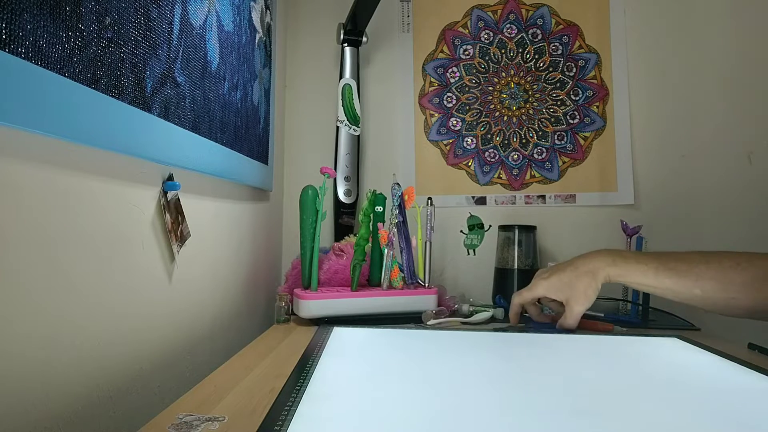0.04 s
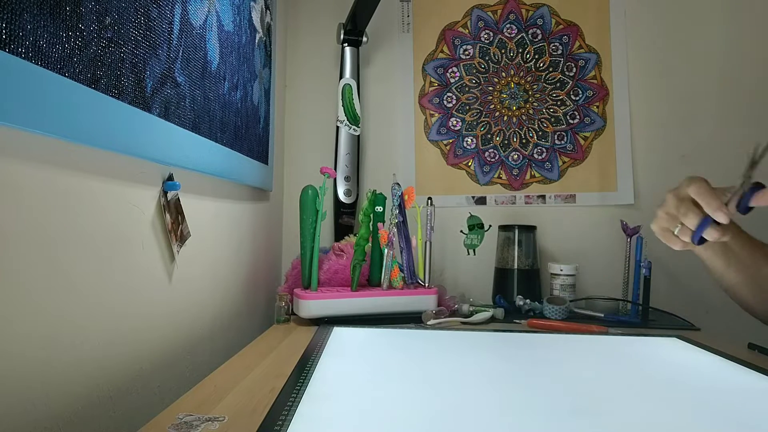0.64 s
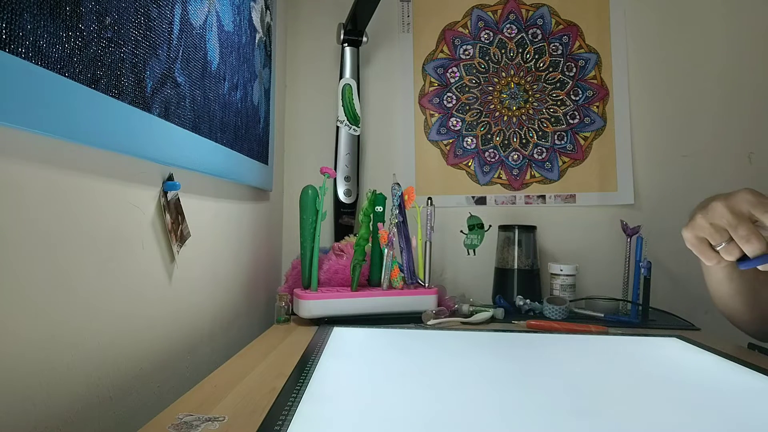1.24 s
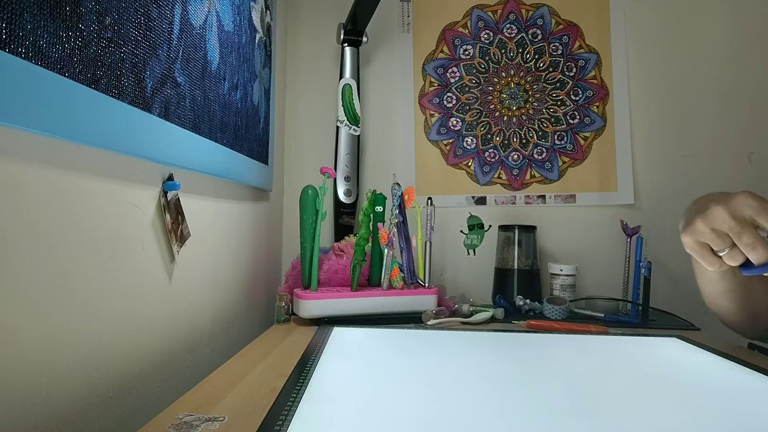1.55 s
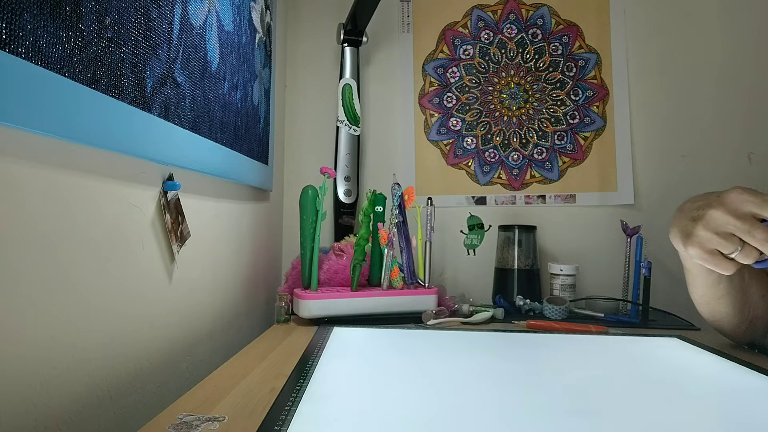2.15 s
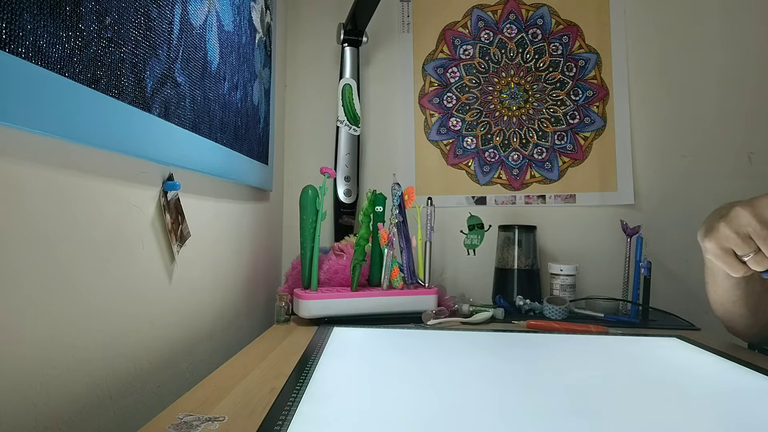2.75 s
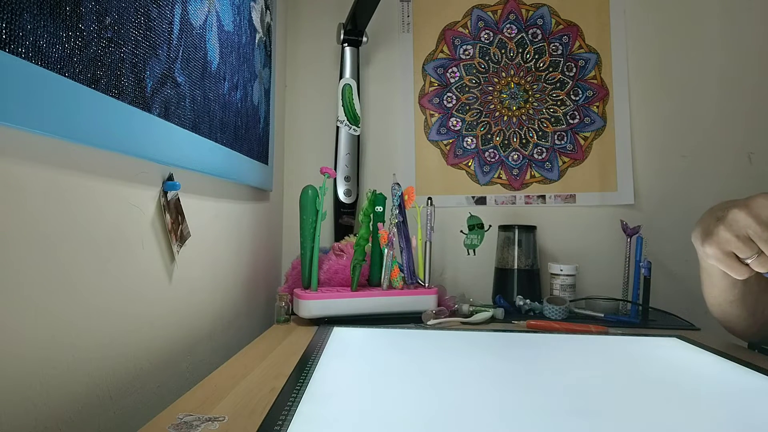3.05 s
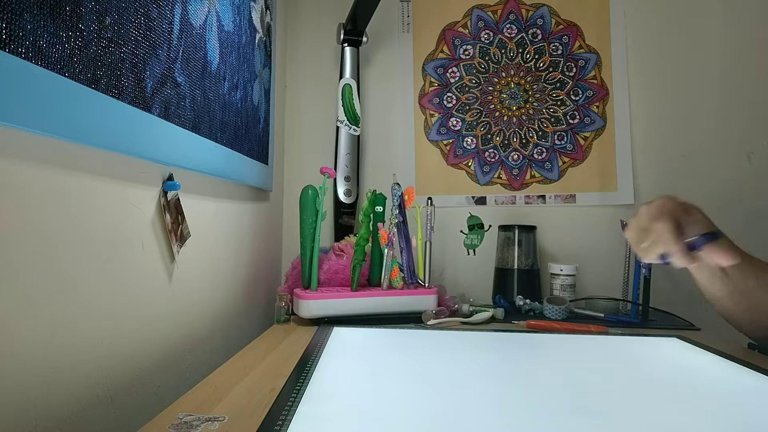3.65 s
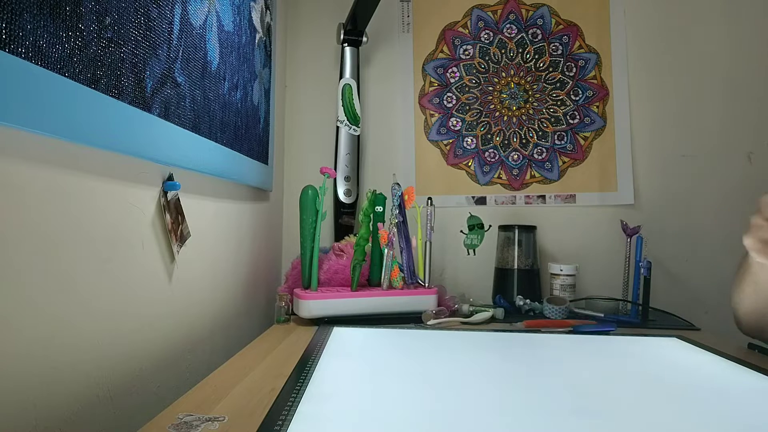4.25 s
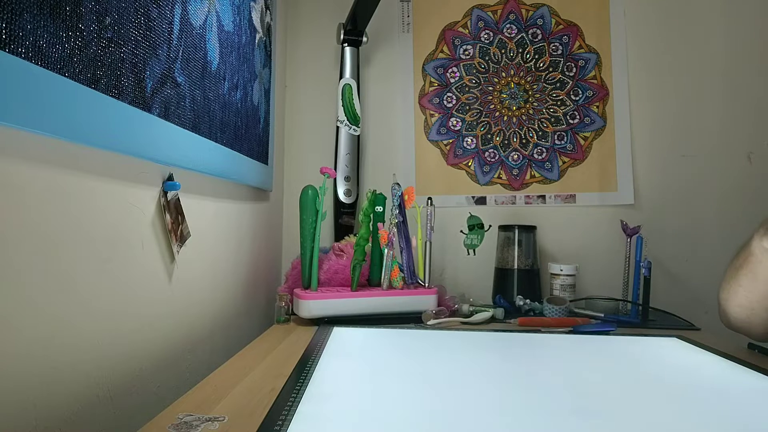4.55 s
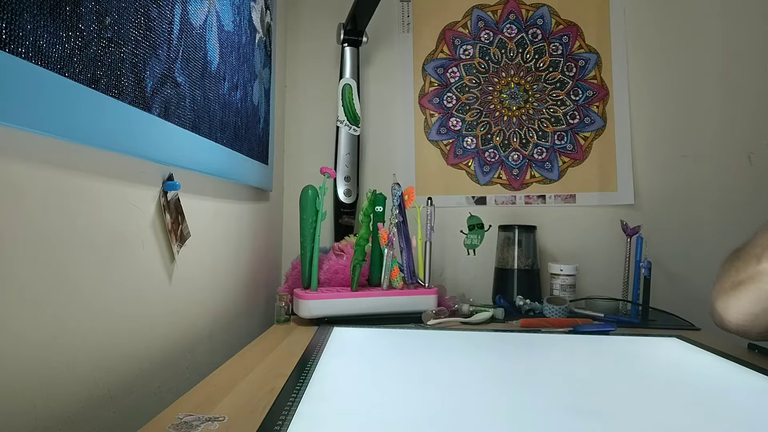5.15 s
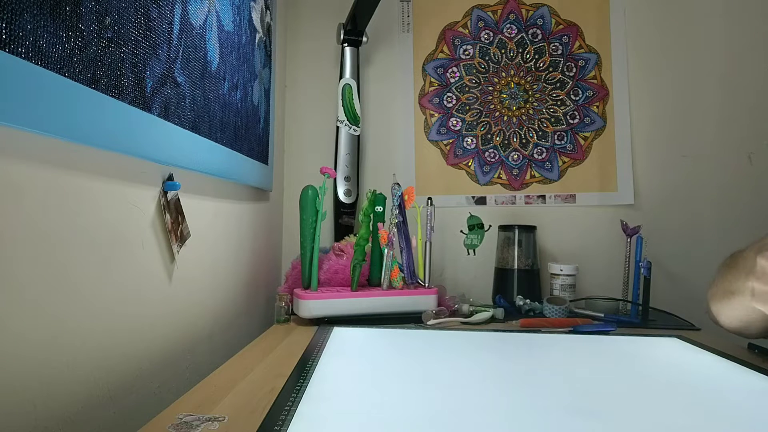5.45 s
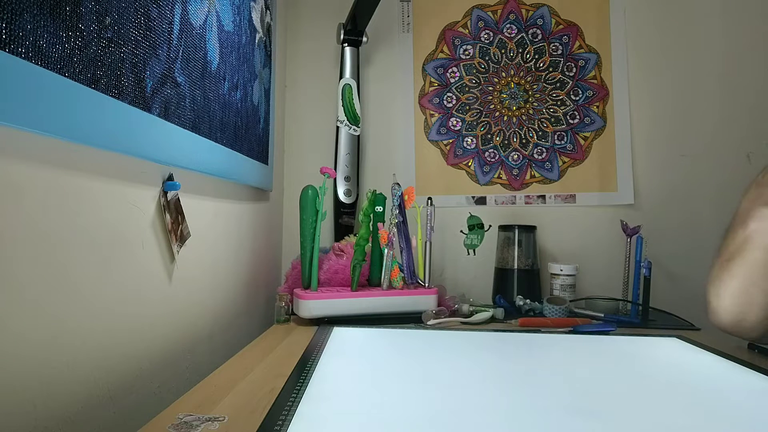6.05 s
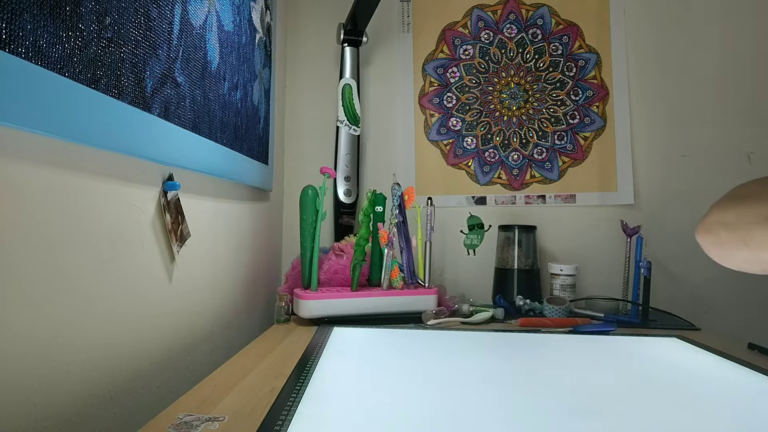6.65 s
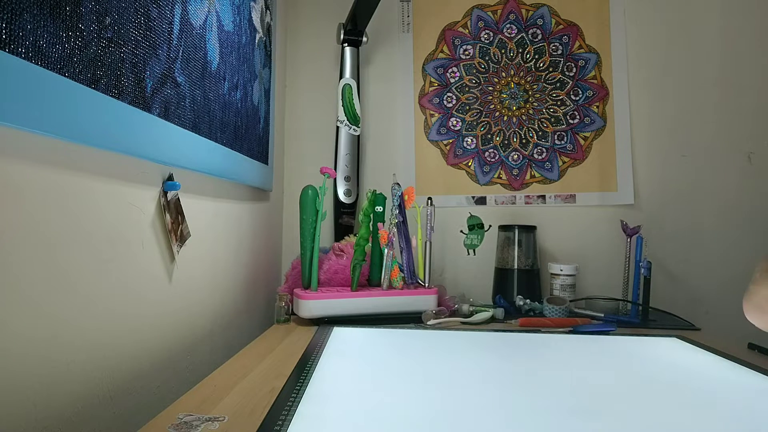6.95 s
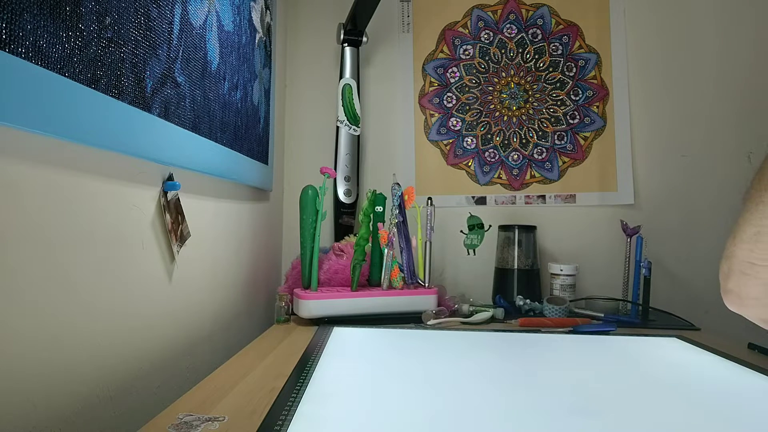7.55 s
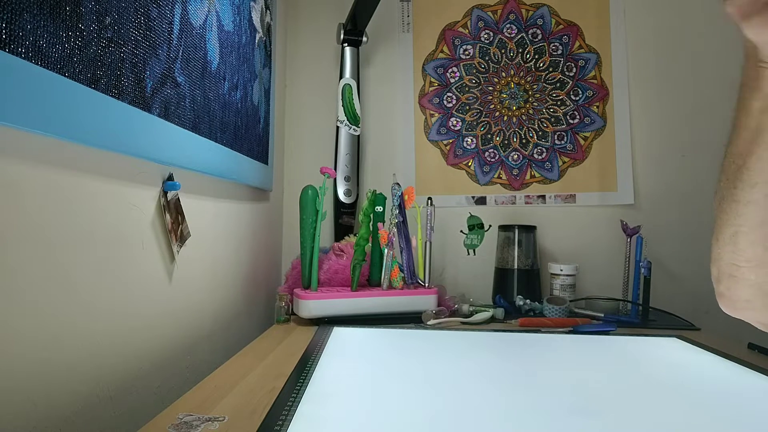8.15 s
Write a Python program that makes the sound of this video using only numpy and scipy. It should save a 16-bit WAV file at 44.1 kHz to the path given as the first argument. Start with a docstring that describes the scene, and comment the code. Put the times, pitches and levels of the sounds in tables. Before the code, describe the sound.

Scissors slide and clack lightly as they are picked up from a desk. They nip at the taut plastic wrap of a rolled canvas in a few bright, separate cracks, then are put down with a clatter and a thud. Hands pull at the wrap, which crinkles continuously with sharp snaps, small creaks and soft bumps. The sound is close, in a small, quiet room.

```python
"""At a desk in a small room, scissors slide and clack as they are picked up. They nip at the plastic wrap
of a rolled canvas, and the taut film parts with bright cracks. Put down with a clatter, they make the
desk thud and their blades ring. Then hands pull at the wrap: the film buckles in sharp snaps over a
dense crinkle, creaks under tension, and the roll bumps softly. A faint mains hum lies under it all."""
import sys
import numpy as np
from scipy import signal
from scipy.fft import rfft, irfft
from scipy.io import wavfile
from scipy.ndimage import uniform_filter1d

SR = 44100
rng = np.random.default_rng(int(sys.argv[2]) if len(sys.argv) > 2 else 0)


def persist_wave(psi):
    """Save psi, clipped to +-1, as 16-bit WAV."""
    counts = np.round(np.clip(psi, -1, 1) * 32767).astype(np.int16)
    wavfile.write(sys.argv[1], SR, np.atleast_2d(counts).T)


N = 365765

# Levels in the event tables are relative: each layer has its own gain in the mix.
# Cuts in the film. Each row: start in seconds, crack level in dB, body level in dB, body pitch in Hz.
FILM_CUTS = [(1.2193, -34, -50.5, 2210), (1.2998, -25.5, -51, 600), (1.302, -39, -52, 4300),
             (1.356, -39, -55.5, 1980), (1.4775, -52, -64, 1900), (1.8412, -37, -66, 2330),
             (1.8632, -37, -55, 3490), (1.8748, -15, -48.5, 3140), (1.8872, -12.5, -37.5, 2980),
             (1.937, -10.5, -37.5, 2360), (1.939, -30, -46, 600), (2.1142, -23, -56.5, 3340),
             (2.5316, -24, -51.5, 3300), (2.5518, -21, -55, 3300), (2.8364, -35, -67, 3120),
             (3.024, -32.5, -67, 3120), (3.252, -23, -56.5, 3500), (3.274, -11.5, -52, 4100),
             (3.3331, -1.5, -42, 1650)]
# Scissors on the desk. Each row: start in seconds, clack level in dB, thud level in dB, pitch in Hz.
DESK_KNOCKS = [(0.064, -24.5, -46, 1040), (0.105, -14.5, -57, 5330), (0.118, -19, -64, 5570),
               (0.175, -16, -61, 6370), (0.182, -10, -68, 2800), (0.193, -17.5, -49, 2600),
               (0.217, -17.5, -59, 3000), (0.23, -14, -45, 2110), (3.76, -23.5, -41, 964),
               (3.846, -26, -42.5, 1490), (3.864, -33, -40.5, 1510), (3.907, -13, -37, 1120),
               (3.92, -13, -27, 2210), (3.938, -20, -45, 1890), (3.956, -40, -35, 1200),
               (3.97, -23, -34.5, 1440), (3.984, -26, -37, 910), (4.044, -1, -34.5, 6730),
               (4.081, -10, -34.5, 1830), (4.1, -17, -40, 1900)]
# Spectrum of buckling film. Each row: frequency in Hz, relative density in dB.
FILM_SPECTRUM = [(1060, -41), (1800, -22.5), (4100, -15), (4790, -7), (7300, -3), (10200, 1), (14900, -2.5),
                 (15600, 2), (16000, -56)]


def snaps():
    """Snap-through buckling: folds flip with a pitched tick and shake the sheet; taut patches pop."""
    # Each row: start in seconds, crack level in dB, body level in dB.
    folds = [(0.3442, -18.5, -54), (0.405, -25.5, -51.5), (0.446, -32, -55.5), (0.594, -35.5, -64),
             (0.9126, -46, -61), (1.6064, -35.5, -57), (4.2472, -26, -51), (4.295, -25, -38),
             (4.567, -27.5, -48), (4.72, -45, -66), (4.758, -38, -49.5), (4.771, -30, -48),
             (4.8, -13.5, -46), (4.812, -24, -55), (4.856, -18.5, -45), (4.8894, -13, -48),
             (4.9323, -0.5, -34), (4.953, -9.5, -32.5), (4.981, -19, -47), (5.0703, -4.5, -28.5),
             (5.0862, -5, -29), (5.1131, -7, -28.5), (5.233, 0, -33), (5.269, -13, -35.5),
             (5.3197, 2, -36.5), (5.4004, -5, -38.5), (5.4122, -9.5, -39.5), (5.4332, -14, -38.5),
             (5.5619, -5, -33.5), (5.62, -12, -47), (5.679, -2, -31.5), (5.7039, 0, -32),
             (5.7188, -1.5, -31), (5.738, -9, -44), (5.8315, -12, -35), (5.8423, -10, -32),
             (5.9363, -9, -46), (5.9703, -5.5, -35), (6, -7, -39.5), (6.0932, -4.5, -38.5),
             (6.218, -11, -59), (6.233, -11.5, -58), (6.258, -8.5, -47), (6.306, -6, -36),
             (6.3218, -5, -39), (6.3298, -0.5, -33), (6.363, -4.5, -35), (6.4642, -3.5, -50.5),
             (6.494, -13, -56), (6.5383, 0.5, -40.5), (6.5474, -3, -37), (6.5772, -6.5, -50),
             (6.7175, -7, -48), (6.7304, -5, -40.5), (6.781, -4, -37.5), (6.8087, -11, -45),
             (6.8555, -5, -46), (6.9679, -8.5, -41), (7.0158, -11.5, -38), (7.11, -10.5, -60),
             (7.171, -15, -39), (7.196, -11, -38.5), (7.21, -8.5, -40), (7.383, -20.5, -42.5),
             (7.4406, -11, -38), (7.5711, -9, -40), (7.8444, -12, -61.5), (7.966, -8.5, -54),
             (8.0043, -10, -50), (8.0174, -6, -59), (8.0362, -10, -47.5), (8.0524, -4, -32),
             (8.0746, -7, -32.5), (8.0893, -1, -41), (8.121, -8, -51), (8.2287, -2.5, -43)]
    # Membranes, lower the wider they are. Each row: start in seconds, level in dB, pitch in Hz.
    patches = [(5.34, -36.5, 760), (5.68, -31, 670), (5.721, -30.5, 772), (5.938, -23, 4900),
               (5.94, -35.5, 383), (6.165, -23.5, 6250), (6.204, -18, 6400), (6.2279, -29, 6950),
               (6.301, -36, 660), (6.461, -14, 6900), (6.546, -34, 500), (7.57, -33.5, 2440),
               (7.789, -34, 2436), (7.966, -22, 3070), (8.035, -24, 3826)]
    # Each row: frequency in Hz, relative density in dB.
    sheet_spectrum = [(400, -19), (700, -1.5), (1300, -6), (2000, 0.5), (3500, 2.5), (7000, -2.5)]
    tick_ratio = .9  # amplitude of the tick against its burst
    crack = np.zeros(N)
    for s, crack_db, body_db in folds:
        # wide folds have more body and flutter longer
        flutter_s = np.clip(.01 * from_db(.5 * (body_db - crack_db + 35)), .005, .025)
        hz = rng.uniform(6500, 14500)
        gain = from_db(crack_db) / np.hypot(1, tick_ratio)
        add(crack, s, gain * burst(flutter_s, crack=.63))
        add(crack, s, gain * tick_ratio * tock(hz, cycles=30))
    for s, level_db, hz in patches:
        # the tighter the patch, the more of a crack goes with its pop
        add(crack, s, from_db(level_db + 5) * (hz / 6000) ** 2 * burst(.033, crack=.41))
    body = colour(strikes(folds, 2, t60=.052, crack=.51), sheet_spectrum)
    pops = tocks(patches, 1, 2, cycles=16)
    return from_db(7) * colour(crack, FILM_SPECTRUM) + from_db(25.5) * body + from_db(15.5) * pops


def crinkle():
    """Crumpling: small creases buckle more often as the grip tightens; wide folds rustle lower down."""
    # Each row: start in seconds, hold in seconds, crease level in dB, fold level in dB.
    squeezes = [(0, 0.11, -48, -49.5), (.176, 0.06, -35.5, -67), (.37, 0.06, -49.5, -55.5),
                (4.28, 0.018, -49, -57), (4.435, 0.01, -71, -56), (4.665, 0.022, -58, -68),
                (4.83, 0.1, -42.5, -81), (4.94, 0.023, -30.5, -76), (5.092, 0.0094, -23.5, -50),
                (5.25, 0.21, -33.5, -56), (5.46, 0.16, -32.5, -50), (5.70, 0.016, -24, -47),
                (5.84, 0.02, -28, -49.5), (5.94, 0.073, -34.5, -45), (6.10, 0.01, -27.5, -47.5),
                (6.25, 0.026, -37, -46), (6.325, 0.041, -23.5, -42), (6.48, 0.052, -29.5, -48.5),
                (6.535, 0.027, -23.5, -49), (6.64, 0.1, -31.5, -53), (6.76, 0.12, -27.5, -54.5),
                (7.02, 0.027, -30, -59.5), (7.13, 0.044, -30.5, -60), (7.2, 0.02, -28.5, -49.5),
                (7.27, 0.025, -37, -55), (7.41, 0.042, -44, -55.5), (7.60, 0.2, -33, -52.5),
                (7.78, 0.1, -29.5, -63), (7.96, 0.094, -32.5, -66.5), (8.07, 0.046, -22, -46),
                (8.27, 0.025, -24.5, -54.5)]
    # Each row: frequency in Hz, relative density in dB.
    fold_spectrum = [(100, -11.5), (420, -7), (620, -4.5), (1100, -8), (5000, -8)]
    moves = squeezes + [(4.85, N / SR, -48, -65)]  # once lifted, the roll never quite rests
    grip, sway = handling_gain(moves, 2), handling_gain(moves, 3)
    creases_per_s = np.minimum(270 * (grip / from_db(-33)) ** .6, 2000)
    fine = crackles(creases_per_s, spread_db=4.5, clump_db=4.5, low_hz=4290, high_hz=14960,
                    pitched=.46, cycles=88, even_s=.044)
    wide = crackles(per_s=200, spread_db=4, clump_db=3, low_hz=348, high_hz=1140,
                    pitched=.22, cycles=18, even_s=.028)
    creases = grip * colour(fine, FILM_SPECTRUM)
    rustle = sway * colour(wide, fold_spectrum)
    return from_db(-1.5) * creases + from_db(2.5) * rustle


def nips():
    """Fracture: taut film parts between the blades with a bright crack and a duller, pitched body."""
    # Each row of both: frequency in Hz, relative density in dB.
    crack_spectrum = [(1180, -60.5), (2200, -20), (4200, -6), (7300, 3), (9700, 9), (12700, 1.5),
                      (14900, 3.5), (16000, -23)]
    body_spectrum = [(150, -17), (500, -4), (1000, 0), (1800, 4), (3300, 8), (7000, 1)]
    crack = colour(strikes(FILM_CUTS, 1, t60=.021, crack=.065), crack_spectrum)
    body = colour(strikes(FILM_CUTS, 2, t60=.042, crack=.14), body_spectrum)
    tone = tocks(FILM_CUTS, 2, 3, cycles=9)
    return from_db(7.5) * crack + from_db(27.5) * body + from_db(26) * tone


def scissors():
    """Friction and impact: steel slides, clacks and clinks on the desk, whose top answers with a thud."""
    # Each row: start in seconds, hold in seconds, level in dB.
    slides = [(0, 0.26, -46)]
    # Each row of both: frequency in Hz, relative density in dB.
    steel_spectrum = [(530, -27.5), (900, -8), (1190, -4.5), (4200, -2.5), (9500, 5), (15500, -12)]
    desk_spectrum = [(50, -23.5), (105, 1), (210, -1.5), (1050, 2), (1700, -6.5), (3500, -13)]
    slide = handling_gain(slides, 2) * colour(rng.standard_normal(N), steel_spectrum)
    crack = colour(strikes(DESK_KNOCKS, 1, t60=.031, crack=.23), steel_spectrum)
    clink = blades(DESK_KNOCKS, lambda knock, hz, mode_db: knock[1] + mode_db, t60=.018)
    clack = tocks(DESK_KNOCKS, 1, 3, cycles=26)
    thud = colour(strikes(DESK_KNOCKS, 2, t60=.22, crack=.38), desk_spectrum)
    return slide + from_db(5) * crack + from_db(4.5) * clack + from_db(-20.5) * clink + from_db(23) * thud


def blade_ring():
    """Free vibration: the blades ring on after a nip or a knock, longest when no fingers damp them."""
    def knock_drive_db(knock, hz, mode_db):
        return .65 * knock[1] + mode_db  # even a soft knock sets the free blades ringing

    def nip_drive_db(cut, hz, mode_db):
        body_db, body_hz = cut[2:]
        return body_db - 22 * abs(np.log2(hz / body_hz))  # a nip wakes the modes near its own pitch

    let_go_s = 3.8
    knocked = blades([knock for knock in DESK_KNOCKS if knock[0] > let_go_s], knock_drive_db, t60=.24)
    nipped = blades(FILM_CUTS, nip_drive_db, t60=.17)
    return from_db(-42) * knocked + from_db(-10.5) * nipped


def blades(rows, drive_db, t60):
    """Modal superposition: each blow lands elsewhere, so it drives each mode with its own sign and size."""
    # Each row: frequency in Hz, relative level in dB.
    modes = [(1450, -7), (1845, -4), (2026, -5), (3310, -5), (3420, -8), (3817, -6), (4105, -3), (5080, -7),
             (5590, -1), (6590, 0), (8355, -5), (8833, -1), (10330, -3), (10790, -7), (13510, -1),
             (14980, -7)]
    ringing = np.zeros(N)
    for hz, mode_db in modes:
        blows = np.zeros(N)
        for row in rows:
            sign = rng.choice([-1, 1])
            add(blows, row[0], sign * from_db(drive_db(row, hz, mode_db) + rng.normal(0, 3, 1)))
        ringing += ring(blows, hz, t60)
    return ringing


def creak():
    """Stick-slip: film under tension rasps in small, quick, pitched slips."""
    # Each row: start in seconds, hold in seconds, level in dB.
    pulls = [(2.65, 0.096, -72.5), (4.84, 0.15, -50.5), (5.095, 0.053, -43.5), (5.25, 0.41, -56.5),
             (7.02, 0.32, -51), (7.6, 0.45, -47), (7.7, 0.14, -45)]
    slips = crackles(per_s=480, spread_db=3.5, clump_db=3.5, low_hz=2050, high_hz=4900,
                     pitched=2, cycles=13, even_s=.06)
    return handling_gain(pulls, 2) * slips


def roll():
    """Soft impact: hands and canvas roll bump, and the softer the contact, the duller the thump."""
    # Each row: start in seconds, level in dB, upper band edge in Hz.
    bumps = [(0.065, -26, 400), (5.433, -21, 650), (5.444, -22, 600), (5.702, -25, 400), (5.739, -16, 600),
             (6.1, -26, 190), (7.607, -27, 130), (7.615, -25, 120)]
    track = np.zeros(N)
    for s, level_db, top_hz in bumps:
        band = signal.butter(2, [50, top_hz], "band", fs=SR, output="sos")
        thump = signal.sosfilt(band, burst(.04, crack=2))
        add(track, s, from_db(level_db) * thump / np.linalg.norm(thump))
    return track


def settling():
    """Relaxation: the held wrap settles in faint dry ticks that fade."""
    # Each row: time in seconds, level in dB.
    fade = [(.5, -66), (.95, -69.5), (2.001, -76.5), (3.501, -82)]
    ticks = crackles(per_s=75, spread_db=3, clump_db=3, low_hz=3000, high_hz=12000,
                     pitched=.4, cycles=25, even_s=.25)
    level_db = np.interp(np.arange(N) / SR, *np.transpose(fade))
    high_pass = signal.butter(2, 1800, "high", fs=SR, output="sos")
    return from_db(level_db) * signal.sosfilt(high_pass, ticks)


def crackles(per_s, spread_db, clump_db, low_hz, high_hz, pitched, cycles, even_s, size=512):
    """Shot noise: creases give way in clumps, each with its own size, flutter and pitch; rms about 1."""
    born = rng.random(N) < per_s * from_db(clump_db * drift(25)) / SR
    clicks = born * from_db(spread_db * np.minimum(rng.exponential(1, N), 3.5))
    # a steady pull releases a steady flow of energy
    clicks /= np.sqrt(np.abs(uniform_filter1d(clicks ** 2, int(even_s * SR))) + 1e-4)
    starts, t = np.flatnonzero(born), np.arange(size) / SR
    pitch, length = rng.random((N, 2))[starts].T[:, :, None]
    hz = low_hz * (high_hz / low_hz) ** pitch
    ringing = np.diff(np.sin(2 * np.pi * hz * t) * from_db(-60 * t * hz / cycles), prepend=0)
    ringing /= np.linalg.norm(ringing, axis=1)[:, None]
    flutter_s = .002 + .013 * length ** 2
    flutter = rng.standard_normal((len(starts), size)) * from_db(-60 * t / flutter_s)
    flutter /= np.linalg.norm(flutter, axis=1)[:, None]
    grains = (pitched * ringing + flutter) * clicks[starts, None] / np.hypot(1, pitched)
    samples = starts[:, None] + np.arange(size)
    return np.bincount(samples.ravel(), grains.ravel(), N + size)[:N]


def handling_gain(rows, level_column):
    """Incoherent addition: each move tightens, holds and relaxes, and overlapping moves add in power."""
    tighten_db_per_s, relax_db_per_s = 448, 230.5
    t, power = np.arange(N) / SR, 0
    for row in rows:
        start_s, hold_s = row[:2]
        below_db = tighten_db_per_s * np.maximum(start_s - t, 0)
        below_db += relax_db_per_s * np.maximum(t - start_s - hold_s, 0)
        audible = below_db < 80
        gain = np.zeros(N)
        gain[audible] = from_db(row[level_column] - below_db[audible])
        power = power + gain ** 2
    return np.sqrt(power)


def burst(t60, crack, size=4096):
    """A broadband transient: an impulse, then exponentially decaying flutter; energy 1."""
    flutter = rng.standard_normal(size) * from_db(-60 * np.arange(size) / SR / t60)
    flutter /= np.linalg.norm(flutter)
    flutter[0] += crack * rng.choice([-1, 1])
    return flutter / np.linalg.norm(flutter)


def strikes(rows, level_column, t60, crack):
    """Impulsive excitation: one burst for each row."""
    track = np.zeros(N)
    for row in rows:
        add(track, row[0], from_db(row[level_column]) * burst(t60, crack))
    return track


def tock(hz, cycles, size=1024):
    """Damped oscillation: a small patch loses 60 dB in so many cycles; energy 1."""
    t = np.arange(size) / SR
    motion = np.sin(2 * np.pi * hz * t) * from_db(-60 * t * hz / cycles)
    wave = np.diff(motion)  # a small patch radiates little bass
    return wave / np.linalg.norm(wave)


def tocks(rows, level_column, pitch_column, cycles):
    """Constant-Q decay: one tock for each row, shorter the higher its pitch."""
    track = np.zeros(N)
    for row in rows:
        add(track, row[0], from_db(row[level_column]) * tock(row[pitch_column], cycles))
    return track


def ring(x, hz, t60):
    """Resonance: a unit click starts a decaying sine of height 1."""
    r, w = from_db(-60 / (t60 * SR)), 2 * np.pi * hz / SR
    return signal.lfilter([0, np.sin(w)], [1, -2 * r * np.cos(w), r * r], x + 1e-18)


def colour(x, spectrum, size=2048):
    """Minimum-phase filtering: a causal response with this spectrum; white noise keeps its power."""
    hz = np.arange(size // 2 + 1) * SR / size
    magnitude = rms_one(from_db(at_hz(spectrum, hz)))
    cepstrum = irfft(np.log(magnitude))
    cepstrum[1:size // 2] *= 2  # fold onto positive time
    cepstrum[size // 2 + 1:] = 0
    response = irfft(np.exp(rfft(cepstrum)))
    return signal.fftconvolve(x, response)[:len(x)]


def drift(rate_hz, step=100):
    """Low-passed noise: a slow wander of rms 1, drawn once every `step` samples."""
    r = np.exp(-2 * np.pi * rate_hz * step / SR)
    slow = signal.lfilter([1], [1, -2 * r, r * r], rng.standard_normal(2 * N // step))[N // step:]
    return np.interp(np.arange(N) / step, np.arange(len(slow)), rms_one(slow))


def add(track, s, sound):
    """Superposition: mixes a sound into the track, starting at time s plus 1 ms."""
    start = int(np.clip((s + .001) * SR, 0, N - 1))
    track[start:start + len(sound)] += sound[:N - start]


def from_db(db):
    """Decibels to amplitude ratio."""
    return 10 ** (np.asarray(db) / 20)


def rms_one(x):
    """Normalisation to rms 1."""
    return x / np.sqrt(np.mean(x ** 2) + 1e-20)


def at_hz(points, hz):
    """Interpolation on a log-frequency axis."""
    known_hz, values = np.transpose(points)
    return np.interp(np.log(np.maximum(hz, 1)), np.log(known_hz), values)


def slaps(x):
    """Specular reflection: desk and near walls each return a copy whose delay wanders as the hands move."""
    # Each row: delay in seconds, level in dB.
    reflections = [(.0067, -17), (.0122, -14), (.0196, -16)]
    sway_s = .0004
    reflected = np.zeros(N)
    for delay_s, level_db in reflections:
        lag = ((delay_s + sway_s * drift(3)) * SR).astype(int)
        reflected += from_db(level_db) * x[np.clip(np.arange(N) - lag, 0, N - 1)]
    return reflected


def clutter_echoes(x, level_db, t60):
    """Scattering: the clutter on the desk returns dense first reflections."""
    t = np.arange(SR // 8) / SR
    onset = np.minimum(t / .0018, 1) ** 2
    response = rng.standard_normal(len(t)) * from_db(-60 * t / t60) * onset
    return from_db(level_db) * signal.oaconvolve(x, response / np.linalg.norm(response))[:N]


def room(x, build_s, bands=18):
    """Diffuse reverberation: the energy in each band builds up and dies away as noise."""
    # Each row: frequency in Hz, time to fall 60 dB in seconds.
    decay_times = [(150, 0.19), (4000, 0.31), (9000, 0.29), (15000, 0.21)]
    t = np.arange(SR // 2) / SR
    onset = 1 - np.exp(-(t / build_s) ** 2)
    edges = np.geomspace(100, 17000, bands + 1)
    white, tail = rng.standard_normal((2, N)), 0
    for k, (low, high) in enumerate(zip(edges, edges[1:])):
        band = signal.butter(2, [low, high], "band", fs=SR, output="sos")
        t60 = at_hz(decay_times, np.sqrt(low * high))
        decay = (from_db(-60 * t / t60) * onset) ** 2
        energy = signal.oaconvolve(signal.sosfilt(band, x) ** 2, decay / decay.sum())[:N]
        tail = tail + np.sqrt(np.abs(energy)) * rms_one(signal.sosfilt(band, white[k % 2]))
    return tail


def room_tone():
    """The noise floor: quiet air and a mains hum that wavers slightly in phase."""
    # Each row: frequency in Hz, relative density in dB.
    air_spectrum = [(25, -14.5), (60, -9), (150, -17.5), (240, -9.5), (330, -18), (1200, -28),
                    (4000, -34.5), (16000, -29)]
    hum_hz = 121.4
    air = colour(rng.standard_normal(N), air_spectrum)
    hum = np.sqrt(2) * np.sin(2 * np.pi * hum_hz * np.arange(N) / SR + .46 * drift(1.5))
    return from_db(-69.5) * air + from_db(-79.5) * hum


def scene():
    """Direct and reflected sound add; each source sends its own share into the room."""
    cutting, clatter, ringing = nips(), scissors(), blade_ring()
    wrap = snaps() + crinkle() + creak() + roll()
    direct = cutting + wrap + clatter + ringing + settling()
    sent = from_db(-4) * cutting + from_db(-7) * (wrap + clatter)
    early = slaps(cutting + wrap) + clutter_echoes(sent + ringing, level_db=-5, t60=.2)
    tail = from_db(-2) * room(sent, build_s=.017)
    return (direct + early + tail + room_tone())[None, :]


def record(dry):
    """Soft saturation rounds the highest peaks, and a low-pass cuts the top."""
    cutoff_hz = 15800
    low_pass = signal.ellip(10, .1, 80, cutoff_hz, fs=SR, output="sos")
    return signal.sosfilt(low_pass, np.tanh(dry))


dry = scene()
out = record(dry)
persist_wave(out)
```